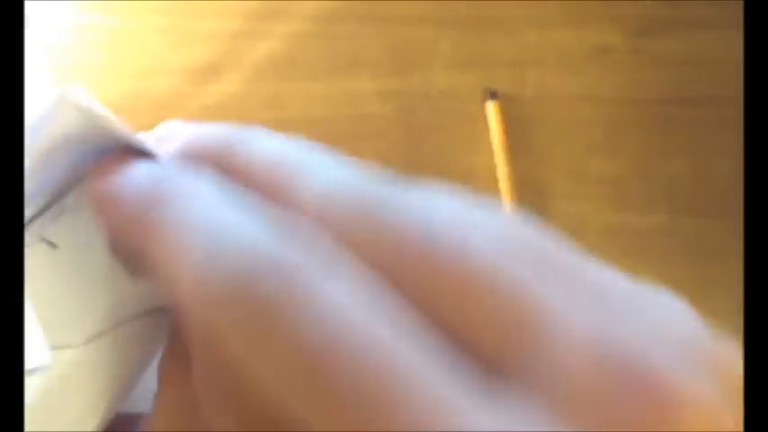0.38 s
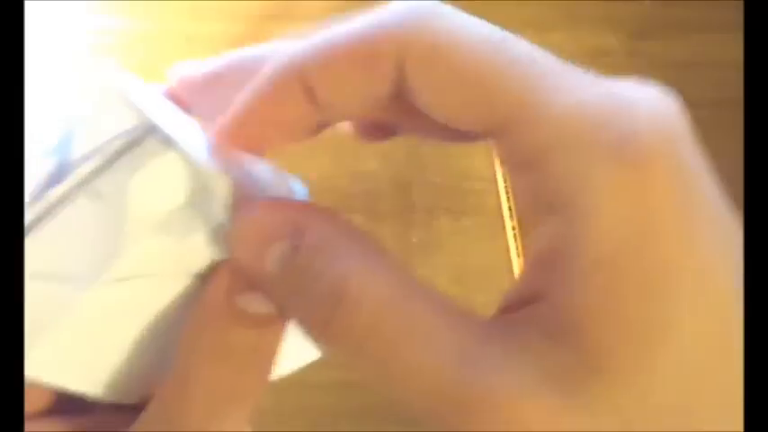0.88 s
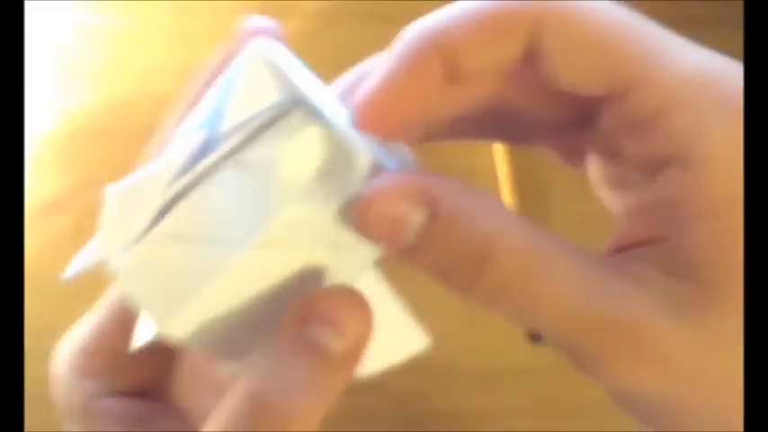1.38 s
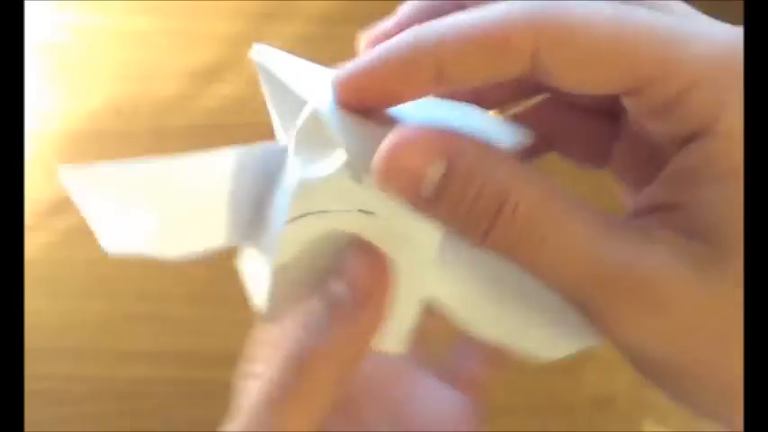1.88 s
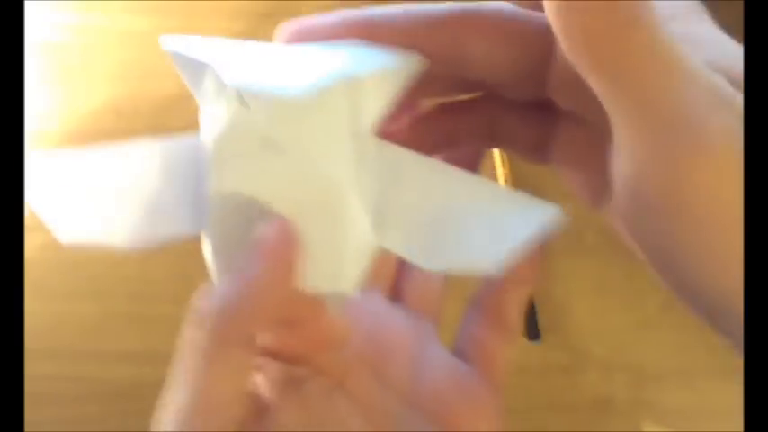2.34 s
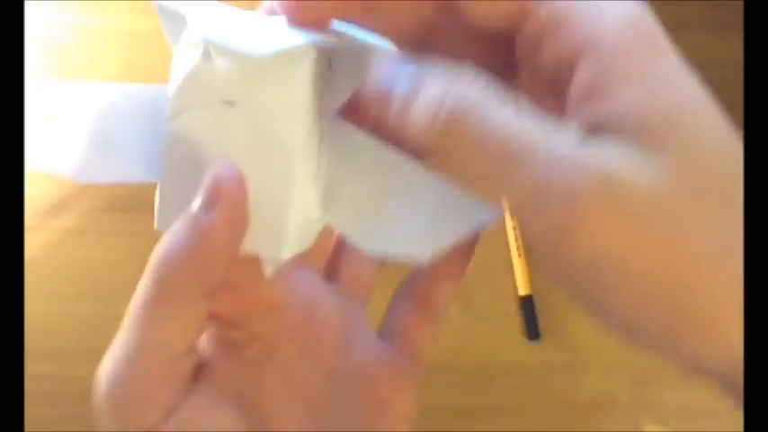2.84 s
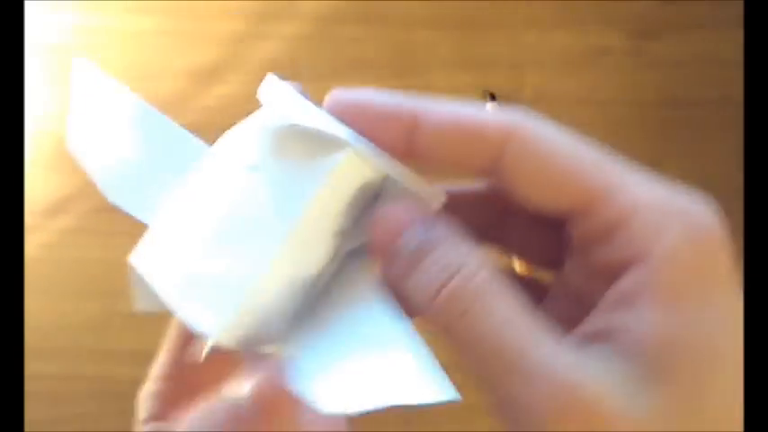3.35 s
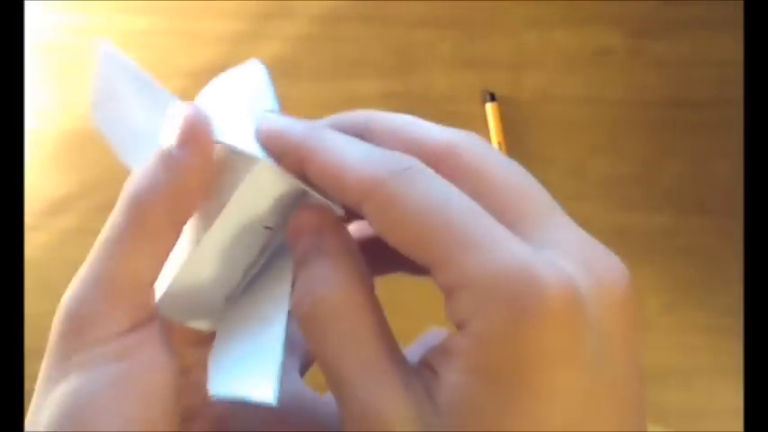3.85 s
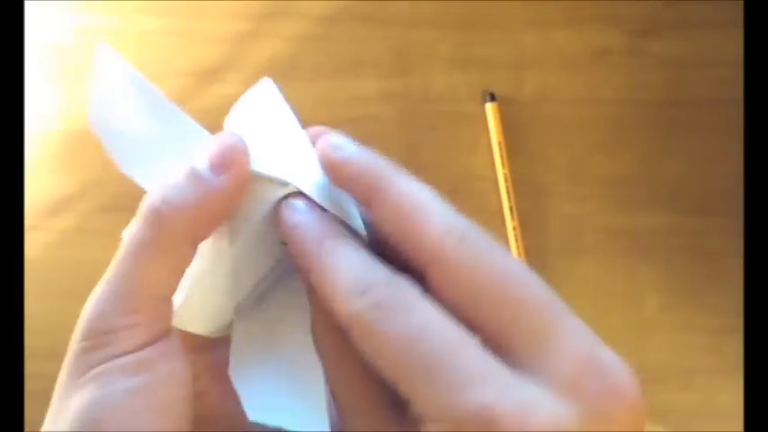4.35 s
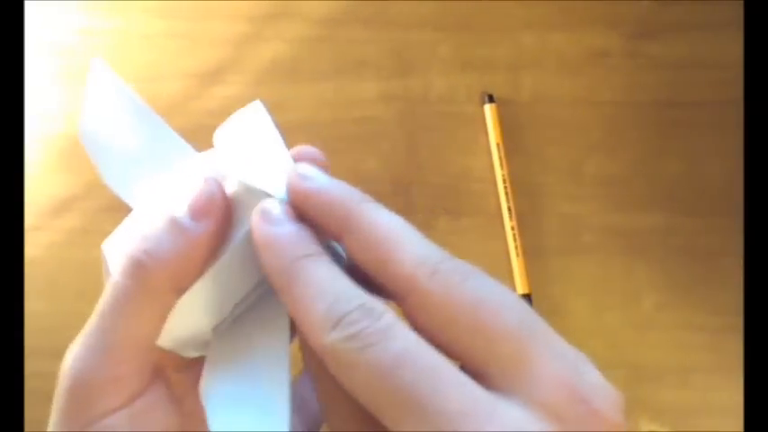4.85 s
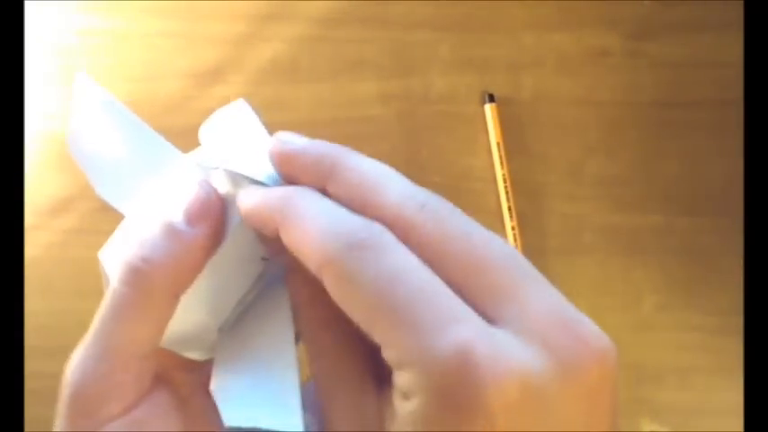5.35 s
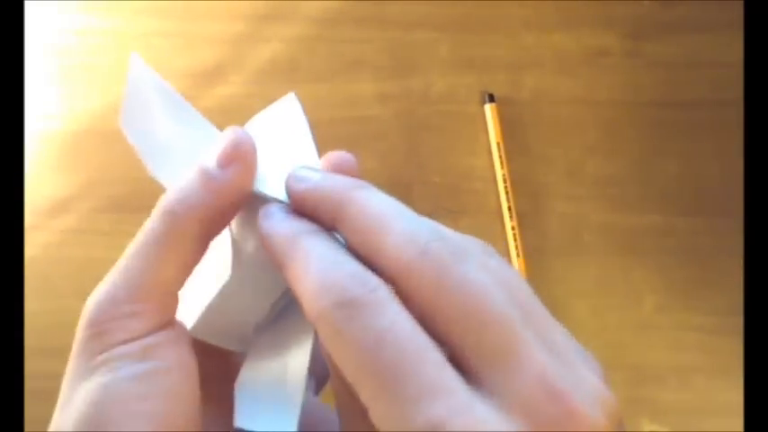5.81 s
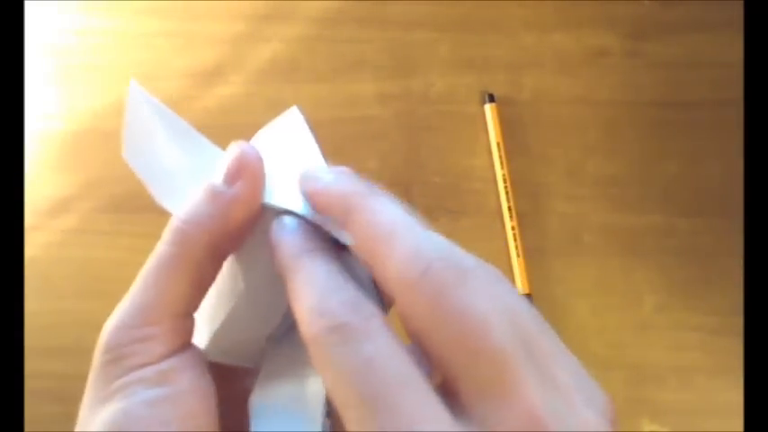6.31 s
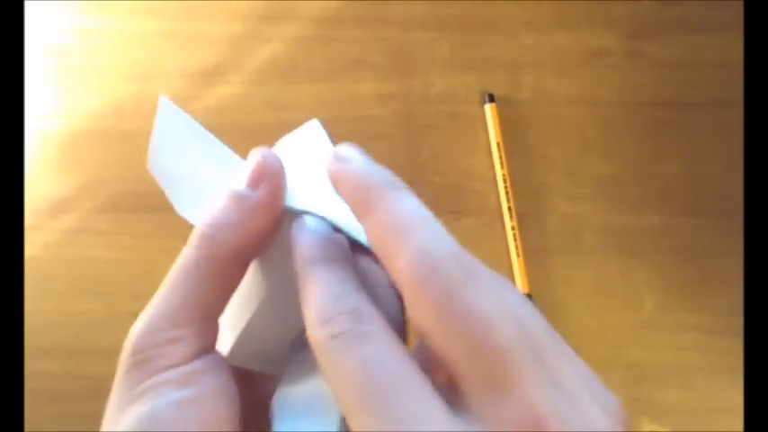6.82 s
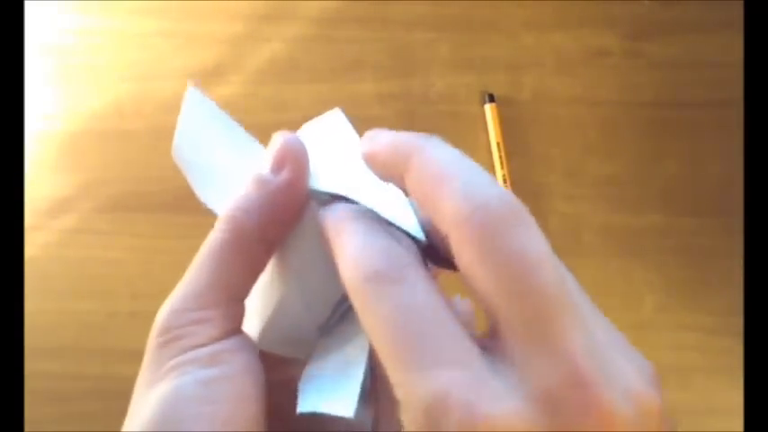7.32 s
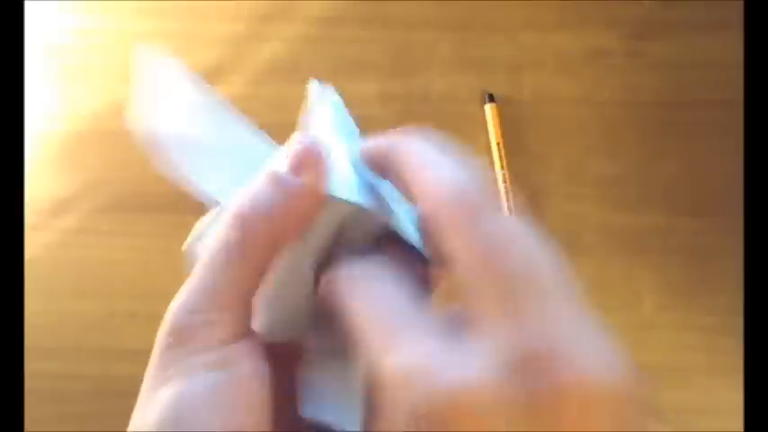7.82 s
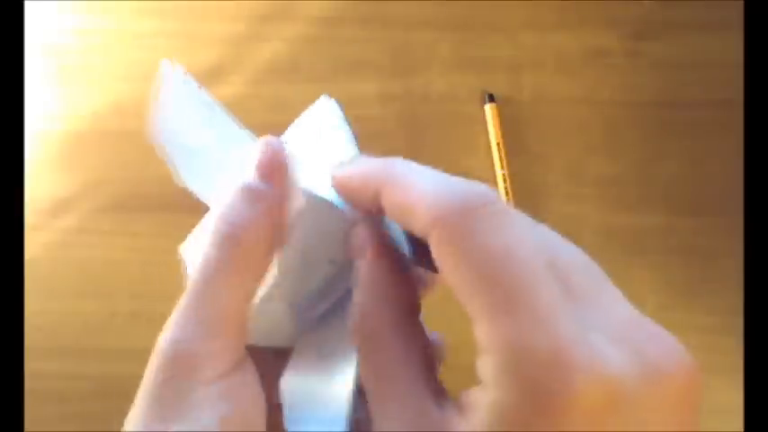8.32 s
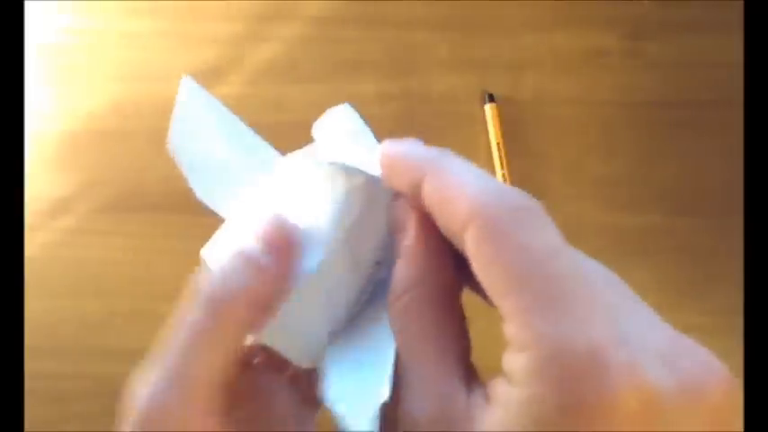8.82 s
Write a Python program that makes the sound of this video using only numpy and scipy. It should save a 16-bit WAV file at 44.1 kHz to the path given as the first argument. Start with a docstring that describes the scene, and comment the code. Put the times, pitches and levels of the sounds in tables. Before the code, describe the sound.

A folded paper figure is turned and creased by hand very close to the microphone in a small room. A flurry of crisp crackles comes early, then light rustling, two strong snaps in the middle, quieter rubbing, and a loudest crunchy burst near the end. Soft table thuds and a faint fan hum lie underneath.

```python
"""A small room with a wooden table: hands turn and crease a folded paper figure, close to a microphone.
Creases snap as ringing pops with torn-fibre noise; sliding fingers are coloured noise that swells and crackles.
Some finger rubs whistle as narrow noise in a resonance near the microphone; arms bump the table with
dying low tones over a rumble. A fan hums faintly as shaped noise with wavering tones; electronics whine thinly.
"""
import sys
import numpy as np
from scipy import signal
from scipy.io import wavfile
from scipy.ndimage import uniform_filter1d

SR = 44100
rng = np.random.default_rng(int(sys.argv[2]) if len(sys.argv) > 2 else 0)


def rack_gain(trim_db):
    """Turn a fader trim in dB into the linear factor to multiply a signal by."""
    fader = np.asarray(trim_db, float)
    return 10 ** (fader / 20)


def generate_wav(signal):
    """Clip the signal to [-1, 1] and save it as 16-bit WAV at the path in sys.argv[1]."""
    frames = np.transpose(np.atleast_2d(signal))
    scaled = np.clip(frames, -1, 1) * 32767
    pcm = np.round(scaled).astype(np.int16)
    wavfile.write(sys.argv[1], SR, pcm)


N = 404838  # length in samples

# Creases giving way: t/s, level/dB, pitch of the buckling panel f/Hz,
# treble crack relative level/dB, low knock relative level/dB
SNAPS = [(0.153, -51, 1090, -3.5, -14), (0.643, -43, 1400, -9.5, -40), (0.714, -28, 2860, -8.5, -40),
         (0.823, -24.5, 2380, -14, -40), (0.868, -25.5, 2050, -22, -32), (0.968, -39.5, 2000, -9, -13),
         (1.003, -36, 2010, -9.5, -14), (1.101, -35, 1970, -14, -15), (1.158, -37, 2000, -14.5, -27),
         (1.205, -44.5, 960, -12, -32), (1.218, -45, 2200, -8, -30), (1.33, -42, 1650, -14.5, -13),
         (1.369, -39.5, 1640, -11.5, -23), (1.644, -27, 1700, -30.5, -15), (1.791, -31, 1610, -17, -10),
         (2.358, -52, 1610, 0.5, -40), (2.961, -25, 2000, -17.5, -14), (2.967, -26, 3000, -22, -25),
         (3.303, -41.5, 1420, -10, -6), (3.469, -43.5, 1150, -8, -18), (3.688, -43, 1780, -4, -4),
         (3.982, -46, 1640, -7, -8), (4.36, -14, 1900, -16.5, -18.5), (4.385, -16, 2200, -22, -40),
         (4.479, -40, 2670, -14, -13), (4.629, -8.5, 2600, -20, -26.5), (4.697, -25, 2200, -28, -28),
         (4.762, -27.5, 1430, -37, -8), (4.781, -21.5, 1670, -25, -17), (4.91, -53.5, 2720, 2, -24),
         (4.968, -48.5, 1490, -7, -13), (4.99, -41.5, 2560, -20, -23), (5.678, -16.5, 2000, -37, -19),
         (5.844, -11, 1900, -10.5, -16.5), (5.884, -28.5, 1680, -14.5, -12), (6.138, -48.5, 1410, -14, -26),
         (6.222, -37, 1680, -13, -19), (6.459, -39.5, 2510, -17.5, -19), (6.499, -39, 1600, -11, -24),
         (6.525, -36, 2060, -28, -24), (6.543, -30.5, 1540, -11, -16), (6.577, -25.5, 1700, -8, -23),
         (6.585, -24, 1800, -9, -23), (6.632, -20.5, 1890, -12.5, -20), (6.72, -38, 1850, -14, -28),
         (7.016, -23.5, 1430, -13, -9.5), (7.04, -15.5, 1670, -23.5, -17), (7.379, -47.5, 1650, -6, -4),
         (7.471, -45.5, 3120, -3, -9), (7.524, -50, 2600, -4, -20), (7.537, -45, 2330, -5.5, -8),
         (7.586, -43, 2020, -11, -10), (7.607, -37, 1990, -12, -16), (7.755, -41.5, 1820, -6.5, -23),
         (7.813, -23.5, 2000, -9, -20), (7.831, -8.5, 1650, -20, -28), (7.838, -5.5, 2710, -19, -31),
         (7.847, -1.5, 1650, -6, -36), (7.873, -20, 1400, -11, -23), (7.875, -13.5, 1550, -9.5, -37),
         (7.918, -24.5, 2090, -13, -12), (7.94, -29.5, 1660, -8, -11), (8.018, -27, 1820, -10.5, -8.5),
         (8.176, -41.5, 1210, -23, -4), (8.232, -29.5, 3100, -14, -37), (8.44, -44, 1660, -11, -14),
         (8.474, -41, 1670, -20, -22), (8.512, -10, 1570, -45, -26), (8.548, -29, 1550, -27, -12),
         (8.636, -36, 1660, -22, -17), (8.658, -34, 2630, -14, -22), (8.696, -30, 2600, -18, -32),
         (8.724, -30, 2600, -14, -30), (8.763, -39, 1430, -10, -7), (8.787, -40, 1620, -13, -20),
         (8.835, -24, 2860, -14.5, -21), (8.901, -43, 1420, -6, -14), (8.924, -30, 2030, -14.5, -21),
         (8.952, -27, 1650, -18, -40), (8.978, -32, 2250, -24, -16), (8.997, -25.5, 1660, -25, -14.5),
         (9.162, -39, 3180, -12, -12)]
# Fixed resonances of the microphone body that colour snaps and rubbing:
# f/Hz, relative level/dB, time to fall 60 dB t/s
MICROPHONE_MODES = [(1170, -4, .03), (1430, 5, 0.01), (1660, -3.5, 0.035), (2030, -5.5, 0.047),
                    (2600, 5.5, 0.015), (3100, -17, 0.033), (3790, -3, 0.025), (4680, -10, 0.036)]
# Arms meeting the table: t/s, thud level/dB, f/Hz, time to fall 60 dB t/s, rumble level/dB
BUMPS = [(1.672, -45, 96, 0.12, -59), (1.794, -36.5, 306, 0.066, -56), (1.86, -42, 102, 0.08, -59),
         (2.283, -33.5, 90, 0.08, -48), (3.298, -48, 120, 0.095, -54.5), (5.848, -40, 293, 0.08, -66),
         (7.849, -27, 332, 0.038, -52), (8.03, -38, 325, 0.087, -52)]


def evened(x):
    """Scales a sound to an rms of 1."""
    return x / np.sqrt(np.mean(x ** 2) + 1e-20)


def read(points, hz):
    """Reads a table between its points, on a log-frequency axis."""
    f, value = np.transpose(points)
    return np.interp(np.log(hz + 1), np.log(f + 1), value)


def add(mix, s, sound):
    """Mixes a sound in at s seconds."""
    part = mix[round(s * SR):][:len(sound)]
    part += sound[:len(part)]


def colour(points):
    """Makes a filter of energy 1 with the given spectrum, which responds only after its input."""
    level_db = np.maximum(read(points, abs(np.fft.fftfreq(4096, 1 / SR))), -70)
    log_gain = np.log(rack_gain(level_db))
    # The Hilbert transform finds the phase that puts the response as early as possible
    taps = np.fft.ifft(np.exp(np.conj(signal.hilbert(log_gain)))).real[:1024]
    return taps / np.linalg.norm(taps)


def through(x, taps):
    """Passes a sound through a filter, keeping its length."""
    return signal.oaconvolve(x, taps)[:len(x)]


def resonate(x, hz, width):
    """Shifts hz down to zero, smooths, shifts back: a resonance of gain 1, width in Hz."""
    turn = np.exp(2j * np.pi * np.cumsum(hz * np.ones(len(x))) / SR)
    r = np.exp(-np.pi * width / SR)
    smooth = signal.lfilter([1 - r], [1, -r], x / turn)
    return 2 * (turn * smooth).real


def resonate_twice(x, hz, width):
    """Two equal resonances in a row cut away more of the sound beside the pitch."""
    return resonate(resonate(x, hz, width), hz, width)


def ring(hz, t60, t):
    """One mode: a sine that falls 60 dB in t60 seconds."""
    return rack_gain(-60 * t / t60) * np.sin(2 * np.pi * hz * t)


def modes(table, t):
    """An object's modes ring together, each with its own pitch, level and decay."""
    return sum(rack_gain(db) * ring(hz, t60, t) for hz, db, t60 in table)


def tents(base_db, s, db, rise, fall):
    """Gain over time: the power of a base plus one swell per event, 20 dB down at its rise and fall times."""
    roundness = 1.6  # 1 = pointed swells; higher = a move holds its level, then stops short
    t = np.arange(0, N + 32, 32) / SR
    away = t - np.asarray(s)[:, None]
    before = -away / np.c_[np.maximum(rise, .002)]
    after = away / np.c_[np.maximum(fall, .002)]
    slope = np.where(away < 0, before, after)
    power = rack_gain(np.c_[db] - 20 * slope ** roundness) ** 2
    return np.sqrt(rack_gain(base_db) ** 2 + np.interp(np.arange(N) / SR, t, power.sum(0)))


def fan():
    """Steady air noise with slight patches, and fuzzy fan tones made of narrow noise."""
    # Fan air and hiss: f/Hz, relative level per Hz/dB
    air_spectrum = [(12, -43), (20, -5.5), (32, -19.5), (155, -13), (188, -40.5), (217, -10.5), (339, -4),
                    (391, -7.5), (437, -5), (547, -13), (1170, -15.5), (2280, -29), (6630, -31),
                    (15700, -32), (16100, -63)]
    # Fuzzy fan tones: f/Hz, level/dB, width of each resonance f/Hz
    hum_tones = [(293, -69, 15.3), (580, -74.5, 13), (879, -77, 6.7), (1080, -82, 5.4)]
    air_db = -59
    frames, hz = N // 512 + 5, np.fft.rfftfreq(2048, 1 / SR)
    a, b, patches = rng.standard_normal((frames, len(hz), 3)).T
    # Smooth across 12 frequency bins, then 8 time frames; the patches vary by 1 dB rms
    patches = evened(uniform_filter1d(uniform_filter1d(patches, 12, 0), 8, 1))
    z = (a + 1j * b) * rack_gain(read(air_spectrum, hz)[:, None] + 1.0 * patches)
    noise = signal.istft(z, nperseg=2048, noverlap=1536)[1][:N]
    air = rack_gain(air_db) * evened(noise)
    waver = rng.standard_normal(N)
    return air + sum(rack_gain(db) * evened(resonate_twice(waver, f, width)) for f, db, width in hum_tones)


def blade():
    """The clearest fan tone wavers slightly in pitch and level; electronics add a thin, even whine."""
    blade_hz, blade_db = 434.7, -62
    whine_hz, whine_db = 14955, -78
    drift, swell = (evened(uniform_filter1d(v, 3000)) for v in rng.standard_normal((2, N)))
    tone_phase = 2 * np.pi * np.cumsum(blade_hz + 3.07 * drift) / SR  # 3.07 Hz rms of drift
    whine_phase = 2 * np.pi * np.cumsum(whine_hz + 40 * drift) / SR
    tone = rack_gain(blade_db + 1.5 * swell) * np.sin(tone_phase)
    return tone + rack_gain(whine_db) * np.sin(whine_phase)


def rumble():
    """Arms shifting on the table make low noise near 101 Hz that swells around each bump."""
    # Rumble between the bumps: t/s, level/dB
    quiet_rumble = [(0.0, -67), (1.45, -67), (2.14, -61), (2.4, -67), (3.4, -66), (3.55, -63), (4.76, -63),
                    (4.86, -67), (9.18, -67)]
    rise_s, fall_s = .05, .075  # over 20 dB around a bump
    s, *_, db = np.transpose(BUMPS)
    low = resonate_twice(rng.standard_normal(N), 101, 148)
    between_db = np.interp(np.arange(N) / SR, *np.transpose(quiet_rumble))
    return tents(between_db, s, db, rise_s + 0 * s, fall_s + 0 * s) * evened(low)


def grit(per_s, spread_db):
    """Friction: tiny slips of uneven size at random moments over smooth noise."""
    size = rack_gain(spread_db * np.minimum(rng.exponential(1, N), 4)) * rng.choice([-1, 1], N)
    slips = size * (rng.random(N) < per_s / SR)
    return evened(evened(slips) + 0.96 * rng.standard_normal(N))


def crackle(low_hz, high_hz, per_s):
    """Small patches of the sheet let go at random; each is a brief noise flurry in one of 8 pitch bands."""
    out, t = np.zeros(N), np.arange(1500) / SR
    flurry_shape = (1 - np.exp(-t / 0.0021)) * np.exp(-t / 0.012)
    for hz in np.geomspace(low_hz, high_hz, num=8):
        size = rack_gain(3.5 * np.minimum(rng.exponential(1, N), 4))
        catches = size * (rng.random(N) < per_s / SR)  # per_s holds for each band
        flurry = through(catches, flurry_shape) * rng.standard_normal(N)
        band = signal.butter(2, [0.84 * hz, 1.173 * hz], "band", fs=SR, output="sos")
        out += evened(signal.sosfilt(band, flurry))
    return evened(out)


def slide():
    """Skin drags low, loudest at the touched panel's pitch; paper edges hiss; both crackle."""
    # Finger moves on the sheet: peak t/s, dull drag of skin level/dB, bright hiss of paper on paper level/dB,
    # rise over 20 dB t/s, fall over 20 dB t/s
    moves = [(0.0, -47, -57, .01, .11), (0.11, -64, -60, .08, .06), (0.17, -66, -59, .03, .12),
             (0.385, -64, -60, .03, .16), (0.52, -66, -63, .04, .12), (0.68, -62, -57, .05, .08),
             (0.716, -46, -42, .005, .12), (0.79, -48, -45, .1, .035), (0.842, -39.5, -40, .025, .05),
             (0.89, -52, -53, .05, .06), (1.008, -53, -51.5, .06, .07), (1.07, -59, -58, .06, .06),
             (1.225, -53, -57, .1, .07), (1.37, -57, -56, .08, .1), (1.515, -52.5, -56, .1, .13),
             (1.716, -53, -53.5, .05, .09), (1.797, -39, -51, .008, .05), (1.85, -57, -56, .06, .15),
             (1.97, -56.5, -55, .2, .12), (2.11, -55, -57, .05, .25), (2.36, -63, -59, .15, .12),
             (2.41, -62, -70, .03, .2), (2.76, -68, -62, .25, .1), (2.87, -65, -63, .06, .2),
             (2.963, -41, -51, .004, .09), (3.06, -58, -56, .12, .4), (3.31, -60, -57, .06, .06),
             (3.39, -66, -59, .04, .1), (3.47, -58, -56, .07, .22), (3.61, -59, -57, .12, .12),
             (3.71, -49, -49, .04, .04), (3.79, -58, -53, .15, .09), (3.94, -58, -59, .15, .09),
             (4.09, -61, -57, .08, .06), (4.148, -58, -48.5, .06, .055), (4.23, -62, -59, .06, .07),
             (4.33, -61, -58, .04, .1), (4.374, -43, -53, .025, .1), (4.486, -60, -56, .015, .12),
             (4.555, -62, -58, .06, .06), (4.6, -56, -60, .2, .06), (4.63, -44, -52, .006, .11),
             (4.737, -62, -58, .015, .03), (4.82, -52, -49.5, .08, .045), (5.05, -66, -67, .4, .4),
             (5.436, -58, -55, .03, .16), (5.603, -60, -56, .1, .15), (5.665, -60, -54, .08, .05),
             (5.765, -57, -55.5, .035, .06), (5.86, -49, -51, .02, .1), (5.995, -57, -57, .02, .075),
             (6.235, -58, -54, .05, .08), (6.33, -63, -72, .2, .2), (6.52, -55, -59, .14, .1),
             (6.583, -45, -46, .015, .06), (6.645, -52, -53, .04, .07), (6.755, -57, -50.5, .07, .1),
             (6.88, -63, -72, .12, .2), (7.045, -47, -64, .025, .1), (7.37, -62, -58, .06, .05),
             (7.416, -54, -47, .05, .035), (7.55, -63, -63, .12, .1), (7.625, -55, -54, .035, .055),
             (7.757, -58, -54, .004, .035), (7.816, -50, -46, .004, .1), (7.852, -29, -27.5, .025, .035),
             (7.88, -35, -34, .03, .03), (7.935, -41.5, -39.5, .08, .075), (8.0, -54, -52, .04, .04),
             (8.022, -39, -43, .006, .06), (8.1, -48, -49, .06, .025), (8.236, -46, -46, .015, .09),
             (8.34, -56, -55.5, .12, .16), (8.517, -44, -59, .006, .08), (8.665, -49, -47, .07, .09),
             (8.72, -46, -51, .08, .025), (8.844, -51, -52, .03, .08), (8.92, -51, -50, .04, .12),
             (8.99, -47, -50.5, .1, .06), (9.105, -49.5, -52, .05, .07), (9.17, -52, -55, .04, .05)]
    # Skin dragging on paper: f/Hz, relative level per Hz/dB
    drag_spectrum = [(290, -42.5), (500, -9), (749, -7), (1060, -4.5), (1640, 1.5), (2160, -1.5),
                     (2570, -2.5), (3270, -2.5), (5000, -11), (6500, -20), (11000, -120)]
    # Paper hissing on paper: f/Hz, relative level per Hz/dB
    hiss_spectrum = [(1760, -17), (3000, -20.5), (3430, -12), (3760, -7), (6530, 4.5), (7160, 1.5),
                     (8600, -5.5), (10500, -15.5), (15300, -23), (16300, -68)]
    hold_drag_db, hold_hiss_db = -67, -72  # hands merely holding the figure
    usual_hz, follow = 1900, .6  # usual panel pitch; share by which it follows the nearest snaps
    flutter_db, flutter_s = .8, .012  # uneven finger pressure: rms, smoothing time

    s, drag_db, hiss_db, rise, fall = np.transpose(moves)
    t, skin = np.arange(N) / SR, grit(1700, 3.7)
    snap_hz = np.interp(t, *np.transpose(SNAPS)[[0, 2]])
    panel_hz = (1 - follow) * usual_hz + follow * snap_hz
    broad = through(skin, colour(drag_spectrum))
    panel = evened(resonate(broad, panel_hz, 1650))
    microphone = evened(through(skin, modes(MICROPHONE_MODES, t[:3000])))
    drag = 0.58 * broad + 0.84 * panel + .25 * microphone
    hiss = through(grit(2500, 2.8), colour(hiss_spectrum))
    drag = drag + .5 * crackle(1230, 4200, 9.0)
    hiss = hiss + .5 * crackle(3660, 7860, 9.0)

    width = round(flutter_s * SR)
    pressure = uniform_filter1d(uniform_filter1d(rng.standard_normal(N), width), width)
    flutter = rack_gain(flutter_db * evened(pressure))
    moving_drag = tents(hold_drag_db, s, drag_db, rise, fall) * evened(drag)
    moving_hiss = tents(hold_hiss_db, s, hiss_db, rise, fall) * evened(hiss)
    return flutter * (moving_drag + moving_hiss)


def snaps():
    """A panel buckles with a short pop and a low knock; fibres crack and the crumple dies after it."""
    # Cracking fibres: f/Hz, relative level per Hz/dB
    crack_spectrum = [(1760, -22), (3000, -8.5), (4750, -6.5), (5280, -7), (6440, -2), (7520, -5.5),
                      (8850, -13), (11300, -25), (15600, -29), (16300, -41)]
    # Low modes of the knocked figure: f/Hz, relative level/dB, time to fall 60 dB t/s
    knock_modes = [(391, -2.5, 0.05), (644, 5, 0.025), (822, 0.5, 0.023)]
    # Crumple's 60 dB fall: longer for softer snaps and for more torn fibre
    crumple_s, soft_s_per_db, crack_s_per_db = .032, .00033, .0005
    t, out, crack = np.arange(4500) / SR, np.zeros(N), 1.68 * colour(crack_spectrum)
    microphone = modes(MICROPHONE_MODES, t)
    low = modes(knock_modes, t) * (1 - np.exp(-t / 0.00052))
    chance = rng.standard_normal((len(SNAPS), 2, len(t)))
    for (s, db, hz, crack_db, knock_db), (slips, fibres) in zip(SNAPS, chance):
        fade_s = np.clip(crumple_s - soft_s_per_db * db + crack_s_per_db * crack_db, .004, .2)
        fade = rack_gain(-60 * t / fade_s)
        start = (1 - np.exp(-t * hz * 0.81)) ** 2  # the panel needs about a cycle to give way
        pop = 4.8 * ring(hz, 6.5 / hz, t)  # falls 60 dB in 6.5 cycles
        crumple = rack_gain(-11) * fade * evened(resonate_twice(slips, hz, 1750))
        overtone = rack_gain(-21) * fade * evened(resonate_twice(slips, 2.02 * hz, 1100))
        panel = signal.lfilter(*signal.butter(2, 4.0 * hz, fs=SR), start * (pop + crumple + overtone))
        rung = rack_gain(-34.5) * through(panel, microphone)  # modes near the panel's pitch ring most
        top_hz = np.clip(14000 + 400 * crack_db, 4000, 16000)  # a weaker crack is also duller
        tear = signal.lfilter(*signal.butter(2, top_hz, fs=SR), through(fibres * fade, crack))
        add(out, s, rack_gain(db) * (panel + rung + rack_gain(knock_db) * low + rack_gain(crack_db) * tear))
    return out


def strokes():
    """Finger rubbing, heard through a resonance near the microphone, is a fuzzy gliding whistle."""
    # Rubbing fingertip: start t/s, length t/s, level/dB, resonance at start f/Hz, at end f/Hz
    rubs = [(0.99, .045, -55, 2000, 2010), (1.05, .045, -61, 2050, 2020), (1.097, .028, -51, 2030, 2040),
            (1.345, .09, -55.5, 1600, 1610), (4.045, .125, -59, 1520, 1480), (4.23, .1, -57, 1620, 1660),
            (5.185, .09, -56, 1540, 1610), (5.585, .09, -59, 2570, 2700), (5.75, .05, -62, 2670, 2700),
            (5.98, .05, -62, 2650, 2700), (6.148, .145, -54, 1570, 1630), (7.215, .12, -56.5, 1500, 1480),
            (8.27, .09, -61, 2670, 2690), (8.65, .085, -51, 2570, 2620)]
    edge = .55  # share of a stroke spent swelling and fading
    out = np.zeros(N)
    noises = rng.standard_normal((len(rubs), N // 20))
    for (s, length, db, first_hz, last_hz), noise in zip(rubs, noises):
        hz = np.linspace(first_hz, last_hz, round(length * SR))
        whistle = resonate_twice(noise[:len(hz)], hz, 165)
        add(out, s, rack_gain(db) * evened(whistle) * signal.windows.tukey(len(hz), edge))
    return out


def bumps():
    """The table top thuds softly: a low tone and a shorter one 2.3 times higher."""
    t, out = np.arange(9000) / SR, np.zeros(N)
    soft_start = 1 - np.exp(-t / 0.0028)
    for s, db, hz, t60, _ in BUMPS:
        thud = ring(hz, t60, t) + 1.3 * ring(2.3 * hz, 0.49 * t60, t)
        add(out, s, rack_gain(db) * soft_start * thud)
    return out


def room(x):
    """Single near echoes, then sparse taps of random sign, each band dying at its own speed."""
    # Echoes off the table top and near things: delay t/s, level against the direct sound/dB
    near_echoes = [(.0042, -14.5), (0.011, -28.5)]
    # Reverberation of the room: f/Hz, time to fall 60 dB t/s
    room_decay = [(300, 0.45), (1500, 0.18), (6000, 0.17), (12000, 0.16)]
    taps = np.zeros(SR // 2)
    at = np.arange(300, len(taps) - 20, 20)
    taps[at + rng.integers(0, 20, len(at))] = rng.choice([-1., 1.], len(at))
    hz, t, z = signal.stft(taps, SR, nperseg=128)
    fading = z * rack_gain(-60 * t / read(room_decay, hz)[:, None])
    tail = signal.istft(fading, SR, nperseg=128)[1]
    tail *= rack_gain(-16) / np.linalg.norm(tail)
    tail[0] += 1  # the direct sound
    for s, db in near_echoes:
        tail[round(s * SR)] += rack_gain(db)
    return through(x, tail / np.linalg.norm(tail))


def scene():
    """Paper and table sound in the room over the fan; the light sheet radiates little bass."""
    no_bass = signal.butter(2, 450, "high", fs=SR, output="sos")
    paper = signal.sosfilt(no_bass, snaps() + slide() + strokes())
    return (room(paper + bumps()) + rumble() + fan() + blade())[None]


def top_cut(x):
    """Nothing passes above the cut-off."""
    return signal.sosfilt(signal.butter(12, 16410, fs=SR, output="sos"), x)


def record(dry):
    """The converter adds a steady bias and flattens the loudest peaks; then the top treble is cut."""
    bias, ceiling = .0026, .9  # of full scale
    clipped = np.clip(dry + bias, -ceiling, ceiling)
    low_pass = signal.firwin(255, 16300, fs=SR)[None]  # edge in Hz
    finished = signal.oaconvolve(clipped, low_pass, "same")
    return top_cut(finished)


dry = scene()
out = record(dry)
generate_wav(out)
```